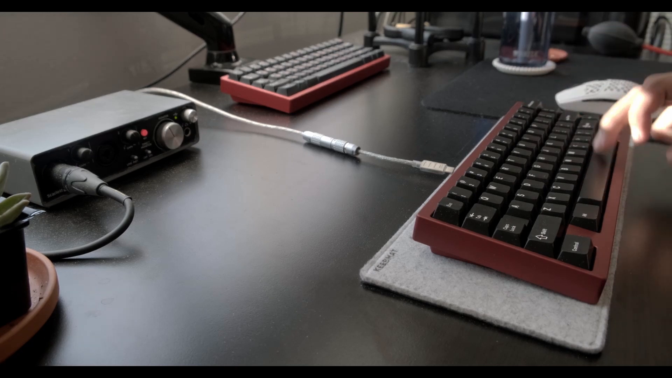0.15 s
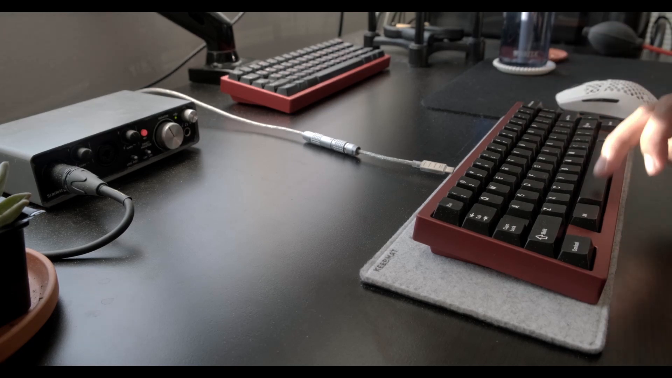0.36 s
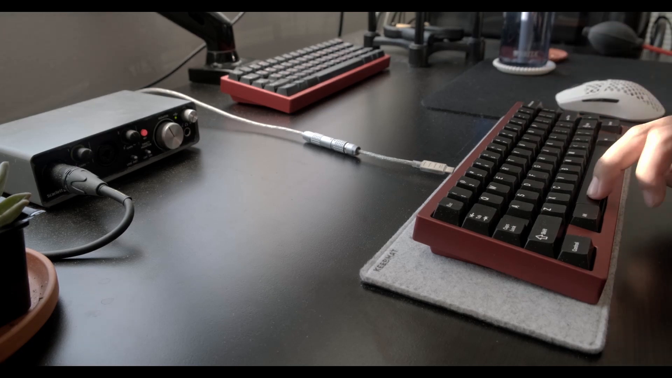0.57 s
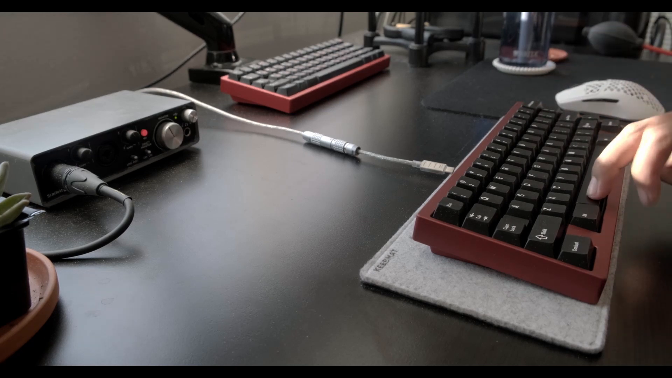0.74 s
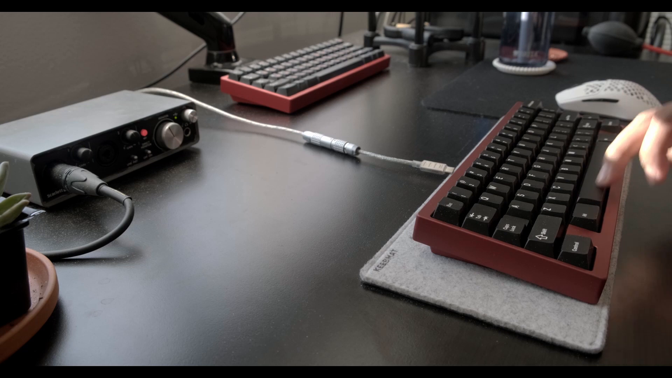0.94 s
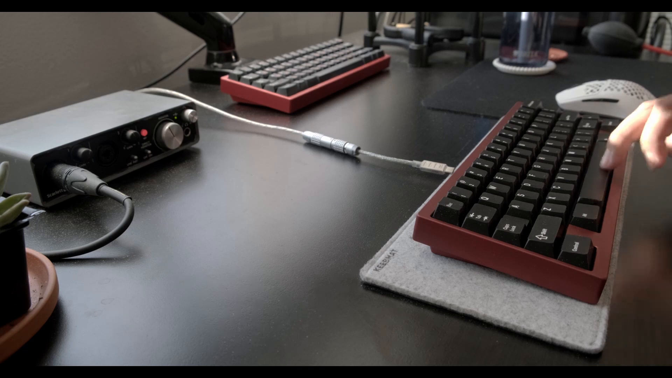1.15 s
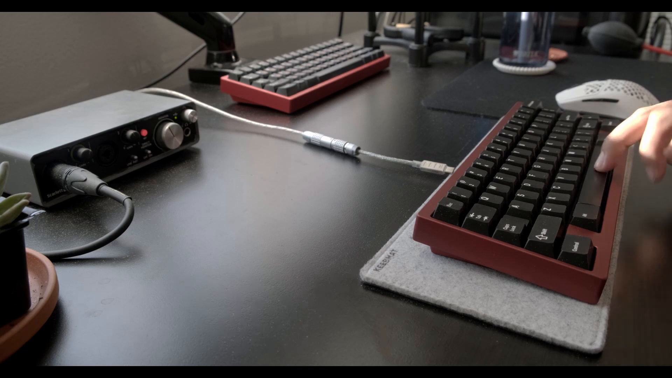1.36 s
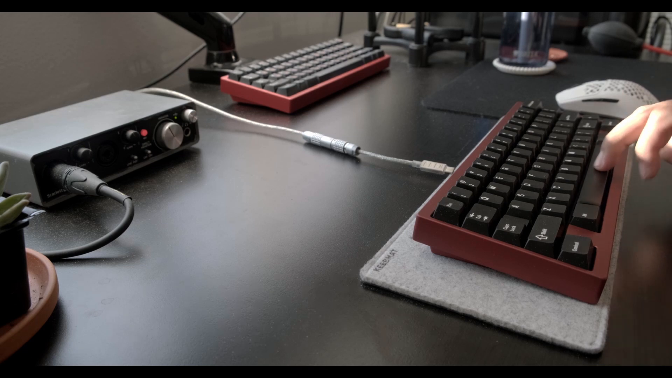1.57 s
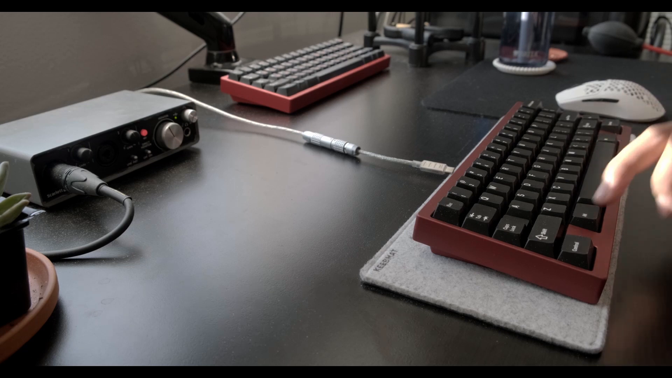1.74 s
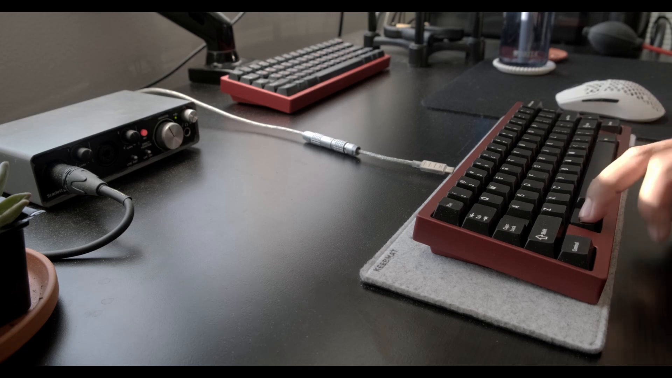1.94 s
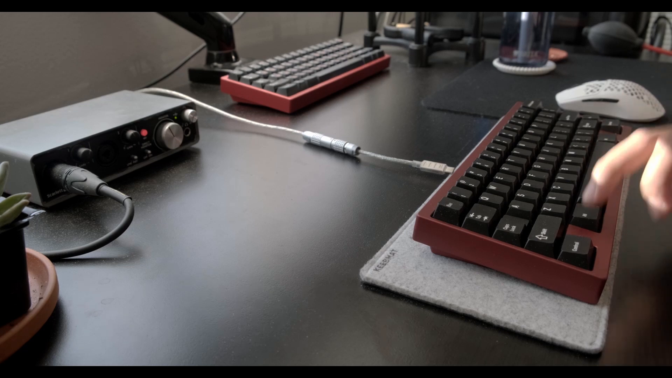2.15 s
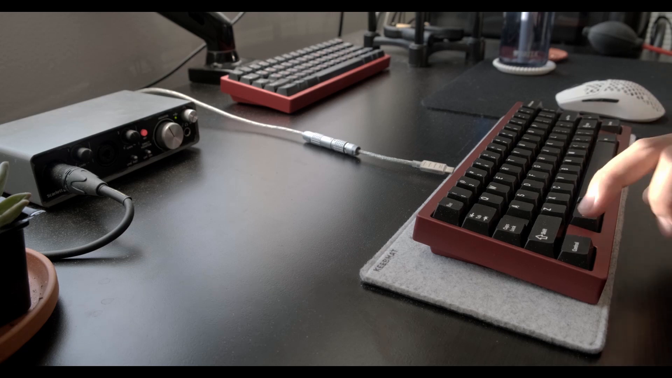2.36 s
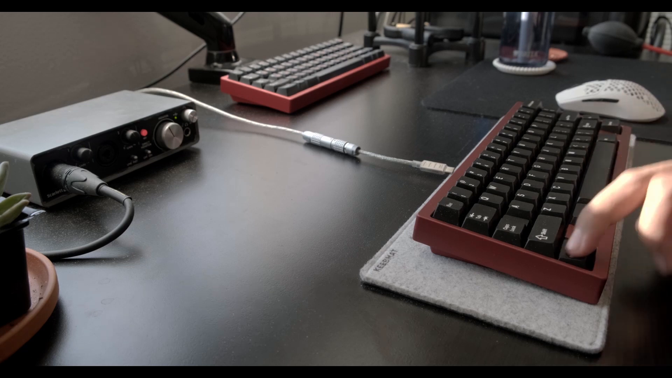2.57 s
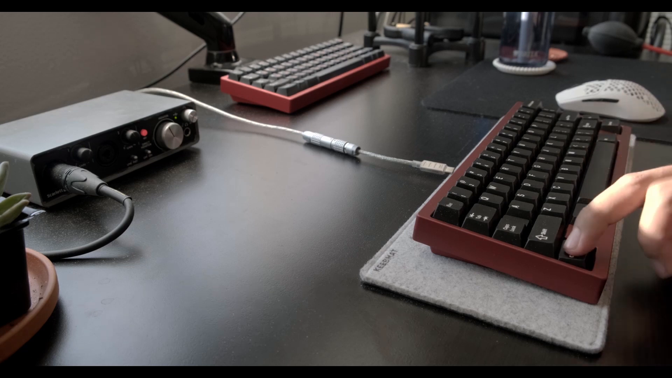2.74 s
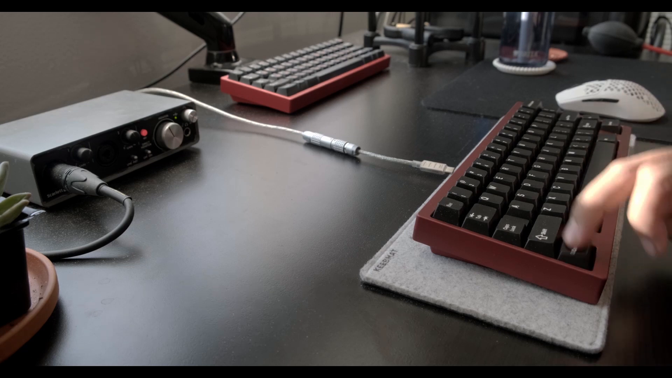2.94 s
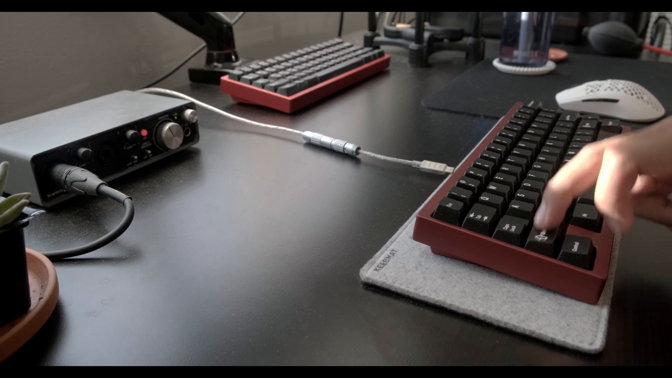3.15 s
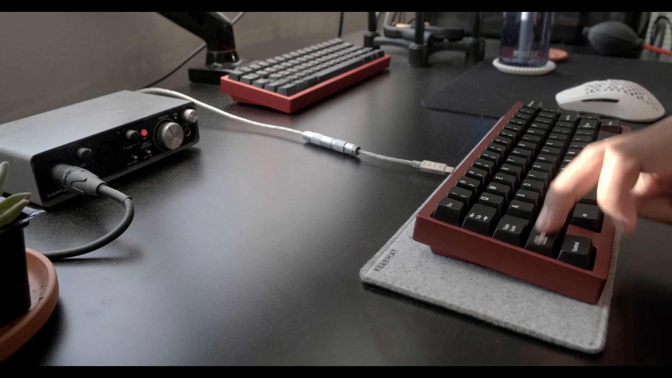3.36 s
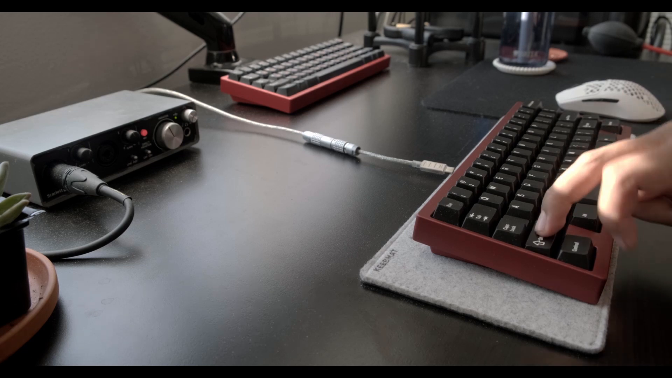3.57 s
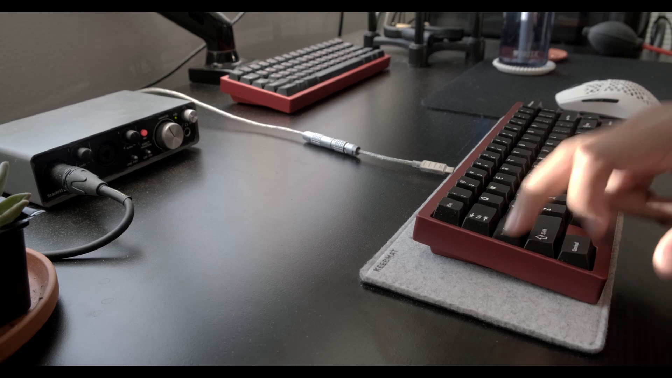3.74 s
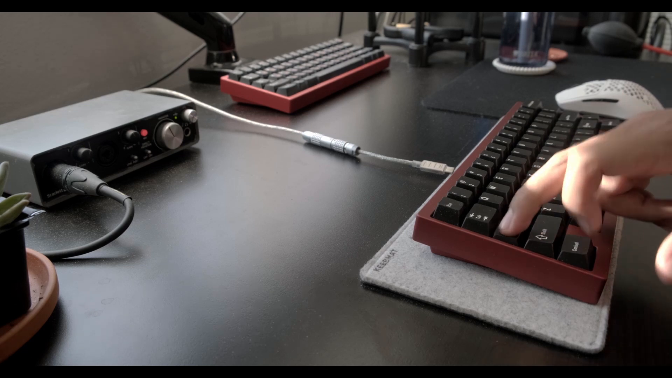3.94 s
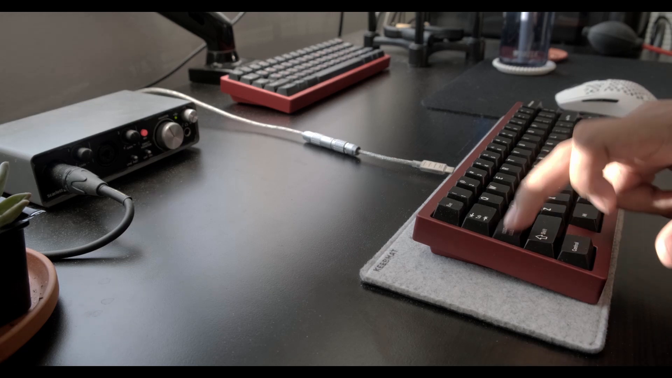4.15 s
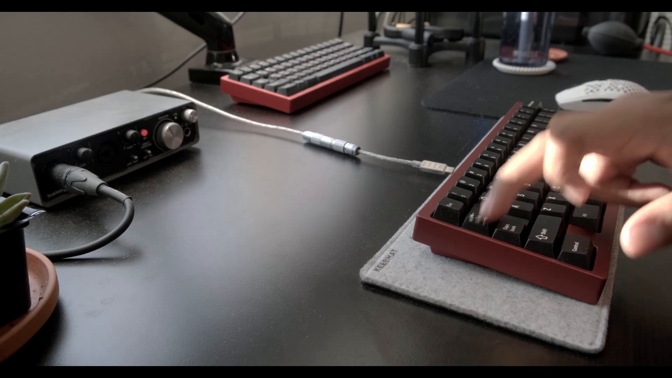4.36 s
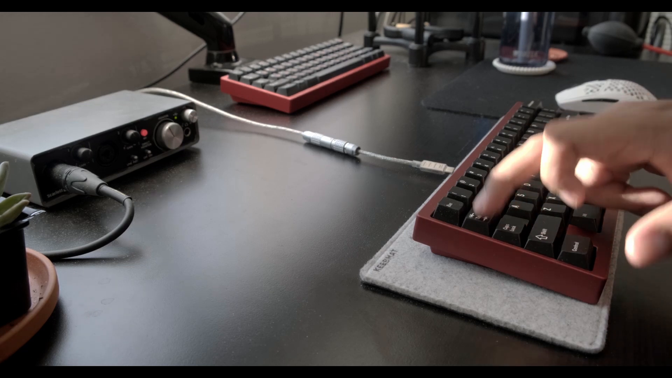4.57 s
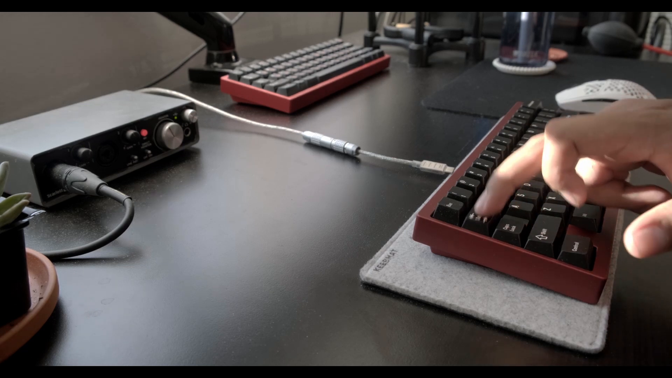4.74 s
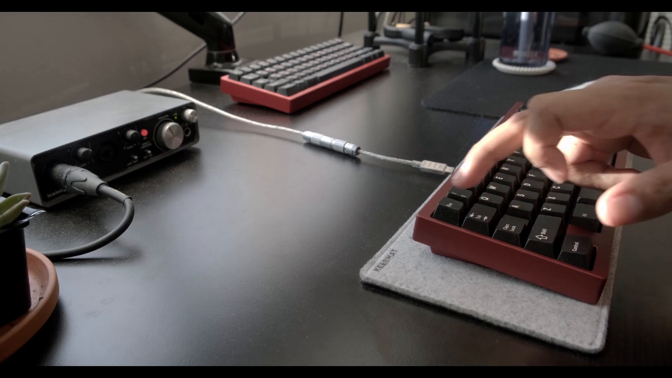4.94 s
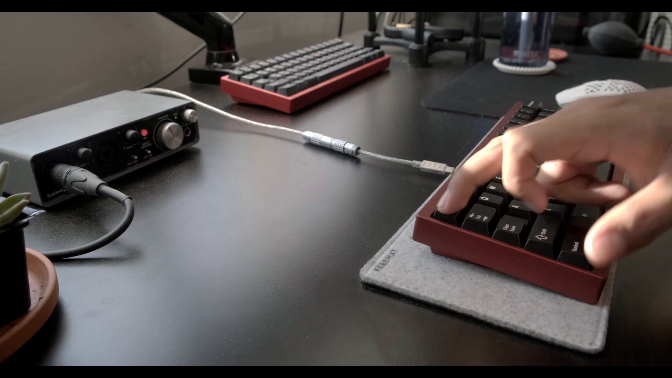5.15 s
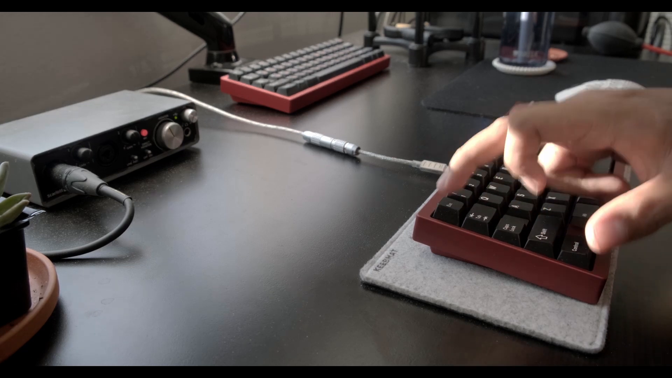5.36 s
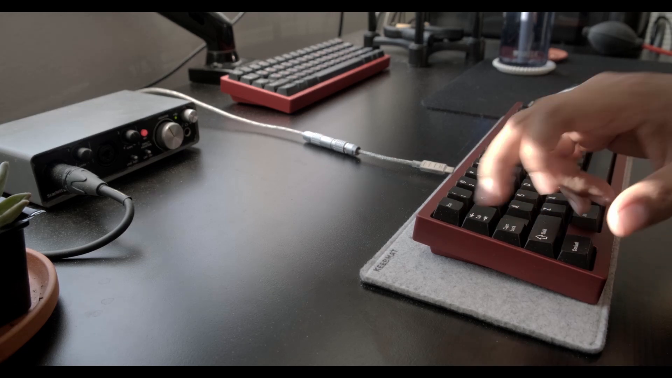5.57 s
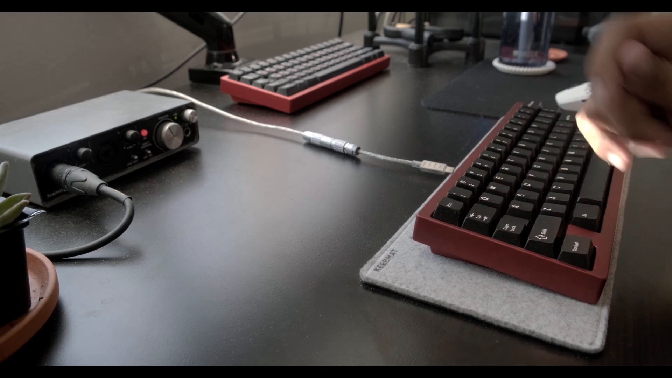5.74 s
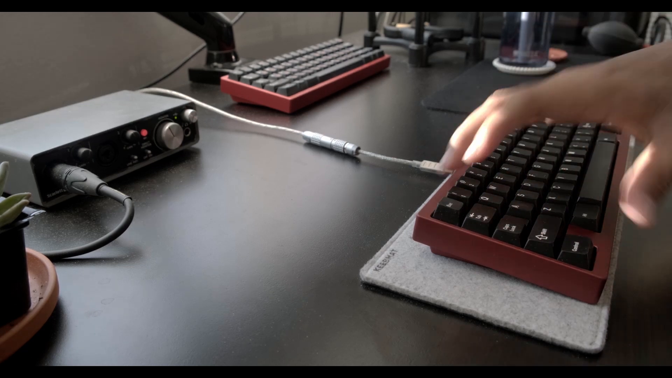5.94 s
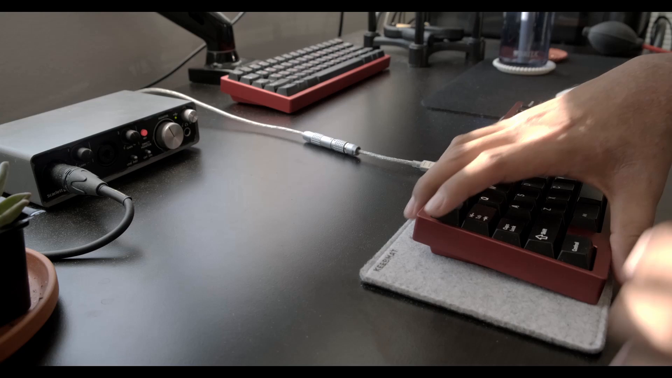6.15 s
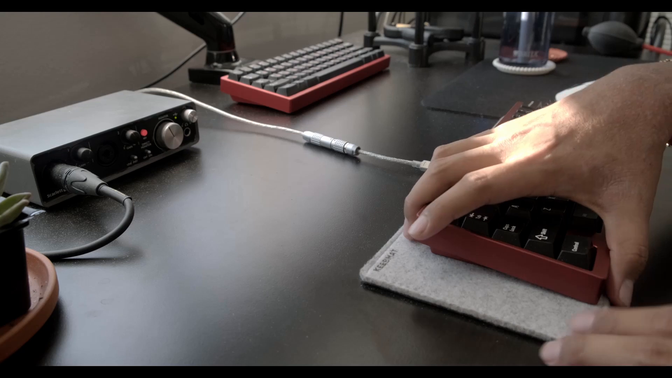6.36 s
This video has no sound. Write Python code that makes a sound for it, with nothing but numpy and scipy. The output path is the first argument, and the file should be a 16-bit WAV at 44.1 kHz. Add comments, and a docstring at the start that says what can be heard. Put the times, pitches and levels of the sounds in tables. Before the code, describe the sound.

Close up in a small room, the space bar of a mechanical keyboard clacks about seven times a second. The finger then moves across six more keys, tapping each four times, the tone shifting from key to key and the level generally dropping. Releases click back and the desk gives soft low thuds. Near the end the taps cease, and a brief skin brush and dull rustle pass over a faint fan hum.

```python
"""Trying out a mechanical keyboard

One finger taps a keyboard on a felt mat: a long run on the space bar, then four taps on each of six keys.
Each key clacks as it bottoms out and ticks as it springs back: impacts ring its resonances and spring.
The desk thuds and sways; a small room answers. The hand brushes away, leaving fan hum and faint hiss."""
import sys
import numpy as np
from scipy import signal
from scipy.fft import rfft, irfft
from scipy.io import wavfile
from scipy.ndimage import uniform_filter1d

SR = 44100
rng = np.random.default_rng(int(sys.argv[2]) if len(sys.argv) > 2 else 0)


def waveform_to_disk(signal):
    """Save audio, clipped to [-1, 1], as 16-bit WAV at the path in sys.argv[1]."""
    frames = np.transpose(np.atleast_2d(signal))
    scaled = np.clip(frames, -1, 1) * 32767
    samples = np.round(scaled).astype(np.int16)
    wavfile.write(sys.argv[1], SR, samples)


N = 282240
TIME_S = np.arange(N) / SR

# Air noise spectrum. Each row: frequency in Hz, relative density in dB.
AIR_SPECTRUM = [(20, -5), (55, -8.5), (90, -4), (160, -10), (220, -9.5), (280, -4), (400, -5), (520, -12),
                (870, -13.5), (1300, -18.5), (2200, -23.5), (4300, -31.5), (8600, -37), (16000, -50.5)]
# Keys bottoming out. Each row: start in seconds, strength in dB.
PRESSES = [(0.0595, 15.5), (0.126, 14), (0.2047, 13), (0.4293, 14.5), (0.5703, 12.5), (0.7063, 11),
           (0.8578, 13), (1.0903, 18.5), (1.2316, 16), (1.3701, 17), (1.5157, 20.5), (1.8093, 11),
           (1.9547, 7), (2.0972, 6.5), (2.2431, 9.5), (2.4692, 15), (2.5998, 7), (2.7421, 6.5), (2.8849, 9),
           (3.1087, 5.5), (3.2503, 4), (3.403, 6.5), (3.5376, 5.5), (3.7737, 4), (3.9155, 3),
           (4.0676, -2.5), (4.1987, -3), (4.4027, 4.5), (4.5319, 1), (4.6845, -7), (4.7879, 0.9),
           (5.035, 9), (5.1586, 2.5), (5.2938, 3.5), (5.437, 6)]
# Keys springing back. Each row: start in seconds, strength in dB.
RELEASES = [(0.282, 13.5), (0.4901, 15.5), (0.8011, -8), (0.9635, 4.5), (1.1724, 10), (1.3122, 12),
            (1.4488, 18.5), (1.6138, 18), (1.8974, 2), (2.0368, 1.5), (2.1623, 13.5), (2.3284, 1),
            (2.5409, 4), (2.684, 5), (2.8107, 11.5), (2.981, 11.5), (3.1826, -2), (3.3303, 2.5),
            (3.4763, -5), (3.6432, 8.5), (3.8449, -0.9), (3.997, -2.5), (4.1255, -0.5), (4.2712, 1.5),
            (4.4531, 2), (4.596, 0.5), (4.7263, -7), (4.8662, -2), (5.0888, 7), (5.2343, 0), (5.3639, 7.5),
            (5.5374, -0.9)]
# Times in seconds at which the finger moves to the next key.
NEXT_KEY_S = [1.7, 2.4, 3.05, 3.7, 4.35, 4.95]
# Resonances of each key in its case.
# Each row: frequency in Hz, width in Hz, gain on press in dB, gain on release in dB.
SPACE_BAR = [(404, 191, -18, -22), (842, 445, -22, -27), (1081, 74, -23, -21), (1400, 294, -6, -11),
             (1705, 492, -4, -14), (2148, 314, 0, -14), (3281, 1250, -10, -23), (3865, 9897, -28, -43),
             (4436, 530, -15, -71), (8158, 1157, -25, -48), (12569, 818, -31, -47)]
KEY_1 = [(713, 176, -19, -17), (1223, 437, -31, -15), (1717, 536, -6, -17), (2216, 276, 0, -12),
         (2302, 4031, -16, -26), (3891, 695, -11, -22), (5341, 1169, -9, -36), (6338, 1398, -59, -21),
         (7682, 715, -4, -64), (9518, 1633, -13, -64), (12047, 2455, -15, -32)]
KEY_2 = [(472, 99, -27, -31), (808, 177, -12, -12), (1460, 382, -3, -8), (1844, 394, -1, -13),
         (2257, 666, 0, -14), (3760, 628, -20, -25), (5381, 1033, -15, -34), (5882, 813, -27, -24),
         (7111, 2199, -16, -34), (11568, 3281, -20, -45), (12378, 683, -13, -30)]
KEY_3 = [(524, 88, -24, -23), (773, 146, -12, -14), (1021, 200, -6, -13), (1612, 509, -4, -7),
         (2162, 478, 0, -9), (2950, 317, -11, -26), (3587, 692, -13, -22), (5318, 412, -55, -12),
         (5408, 2133, -13, -31), (9077, 694, -16, -34), (11319, 6715, -21, -40)]
KEY_4 = [(882, 162, -3, -4), (1081, 74, -8, -8), (1837, 1109, 0, -4), (3447, 2690, -2, -16),
         (3692, 326, -51, -11), (5495, 984, -2, -21), (6733, 710, -51, -13), (8631, 1871, -4, -25),
         (11476, 747, -12, -30), (13139, 355, -10, -21), (14765, 9897, -21, -39)]
KEY_5 = [(929, 152, -10, -9), (1139, 118, -7, -10), (1478, 3714, -19, -13), (1494, 163, 0, -3),
         (3757, 482, -14, -3), (3791, 3740, -3, -22), (6178, 590, -13, -4), (12438, 592, -10, -15),
         (14765, 9897, -22, -34)]
KEY_6 = [(830, 147, -14, -16), (982, 1492, -26, -21), (1066, 103, -11, -9), (1651, 545, -6, -13),
         (2361, 359, -3, -12), (3156, 1234, 0, -13), (4953, 1191, -4, -21), (6859, 697, -56, -25),
         (10113, 6158, -12, -28), (11720, 442, -7, -12), (12597, 738, -9, -23)]
KEY_MODES = [SPACE_BAR, KEY_1, KEY_2, KEY_3, KEY_4, KEY_5, KEY_6]
# Coil spring pings, two per key in key order. Each pair: frequency in Hz, base level in dB.
SPRING_MODES = [
    [(4400, -69), (7700, -75)],
    [(6330, -71), (12550, -77)],
    [(6300, -74), (9050, -76)],
    [(5350, -72), (7400, -80)],
    [(9120, -69), (7000, -73)],
    [(6330, -67), (12520, -79)],
    [(5700, -72), (11800, -73)],
]
# First echoes off the nearest walls. Each row: delay in seconds, gain in dB.
WALL_ECHOES = [(0.011, -20.5), (0.0149, -20.5)]
# Colour of the room's answer. Each row: frequency in Hz, gain in dB.
WALL_COLOUR = [(150, -12), (400, -4.5), (900, 7.5), (1500, -3), (2400, 0), (4000, -5.5), (7000, -3),
               (10000, -4), (15000, -11)]
# Skin over case and mat. Each row: peak time in seconds, level in dB, swell in seconds, fade in seconds.
BRUSHES = [(5.815, -50.5, .04, 0.021), (5.815, -46, .003, .006), (6.22, -68.5, 0.11, .12)]
# Brushing spectrum. Each row: frequency in Hz, relative density in dB.
BRUSH_SPECTRUM = [(1500, -35), (4000, -9.5), (7500, 0.5), (12000, 4), (16000, -6)]


def undb(db):
    """Decibels to gain."""
    return 10 ** (np.asarray(db) / 20)


def unit_rms(x):
    """Scale to rms 1."""
    return x / np.sqrt(np.mean(x ** 2))


def add(track, start_s, sound):
    """Mix a sound into the track."""
    i = max(int(round(start_s * SR)), 0)
    track[i:i + len(sound)] += sound[:len(track) - i]


def bins_hz(size, floor_hz=1):
    """FFT bin frequencies, clamped from below."""
    return np.maximum(np.fft.rfftfreq(size, 1 / SR), floor_hz)


def colour(x, points):
    """Filter by a curve of (Hz, dB) points."""
    hz, db = np.transpose(points)
    gain = undb(np.interp(np.log(bins_hz(len(x))), np.log(hz), db))
    return irfft(rfft(x) * gain, len(x))


def resonance(size, hz, width_hz):
    """Gain per FFT bin of a steep-sided resonance."""
    f = bins_hz(size)
    return 1 / (1 + ((f * f - hz * hz) / (f * width_hz)) ** 2)


def narrow_noise(hz, width_hz):
    """Noise through one resonance, rms 1."""
    return unit_rms(irfft(rfft(rng.standard_normal(N)) * resonance(N, hz, width_hz), N))


def ring(gain):
    """Minimum-phase response of a gain curve: sharp start, then each resonance decays."""
    cepstrum = irfft(np.log(gain + 1e-5))
    half = len(cepstrum) // 2
    cepstrum[1:half] *= 2
    cepstrum[half + 1:] = 0
    return irfft(np.exp(rfft(cepstrum)))


def key_at(time_s):
    """Index of the key under the finger."""
    return np.searchsorted(NEXT_KEY_S, time_s)


def room_tone(air_db=-57.5, hum_db=-60.5, hum_hz=191.3, whine_db=-73, whine_hz=342.4, flutter_db=-67):
    """Steady air noise and fan hum, with slight flutter near the hum's pitch."""
    air = undb(air_db) * unit_rms(colour(rng.standard_normal(N), AIR_SPECTRUM))
    hum = undb(hum_db) * np.sin(2 * np.pi * hum_hz * TIME_S)
    whine = undb(whine_db) * np.sin(2 * np.pi * whine_hz * TIME_S)
    flutter = undb(flutter_db) * narrow_noise(hz=207, width_hz=37)
    return air + np.sqrt(2) * (hum + whine) + flutter


def stem_slides(down_db=-61, down_s=0.022, up_db=-70, up_s=0.045):
    """The stem rubs in its housing, speeding up until it lands or tops out."""
    envelope = np.zeros(N)
    for strokes, db, travel_s in ((PRESSES, down_db, down_s), (RELEASES, up_db, up_s)):
        speed = np.linspace(0, 1, int(travel_s * SR))
        for impact_s, _ in strokes:
            add(envelope, impact_s - travel_s, speed * undb(db))
    friction = envelope * rng.standard_normal(N)
    return colour(friction, [(400, -10), (1200, 1), (3000, 2), (6500, 3), (14000, 0)])


def finger_touches(touch_db=-31, lead_s=0.0068, scatter_db=3):
    """The fingertip lands softly on the cap just before the key bottoms out."""
    out = np.zeros(N)
    for press_s, db in PRESSES:
        earliness, firmness = rng.standard_normal(2)
        touch = clack(press_s, db + touch_db + scatter_db * firmness)
        add(out, press_s - lead_s * np.exp(earliness / 4), touch)
    return out


def clack(start_s, db, tilt_db_per_oct=0, released=False, blur=0, beam_hz=1200, size=4096):
    """One impact rings the key's resonances; harder contact is shorter, so it tilts towards treble."""
    detune, vary_db = 0.0036, 0.76  # the finger never lands on the same spot twice
    power = 0
    for hz, width_hz, press_db, release_db in KEY_MODES[key_at(start_s)]:
        pitch, strength = rng.standard_normal(2)
        gain = undb((release_db if released else press_db) + vary_db * strength)
        # Low modes radiate alike in all directions: no blur below beam_hz.
        blurred_hz = np.hypot(width_hz, blur * max(hz - beam_hz, 0))
        mode = gain * resonance(size, hz * (1 + detune * pitch), blurred_hz)
        power += width_hz / blurred_hz * mode ** 2
    octaves = np.log2(bins_hz(size, floor_hz=300) / 2500)
    body = ring(np.sqrt(power) * undb(db + tilt_db_per_oct * octaves))
    return signal.fftconvolve(body, cap_chatter())


def cap_chatter(amount=0.15, decay_s=0.0022, highpass_hz=3000, size=512):
    """Contact force: one blow, then the light cap chatters with part of its treble energy."""
    contacts = amount * rng.standard_normal(size) * np.exp(-np.arange(size) / SR / decay_s)
    blow = signal.unit_impulse(size)
    chatter = (blow + contacts) / np.sqrt(1 + np.sum(contacts ** 2))
    highpass = signal.butter(1, highpass_hz, "high", fs=SR, output="sos")
    return blow + signal.sosfilt(highpass, chatter - blow)


def keystrokes(blur=0, press_db=-0.13, release_db=1.47, press_db_per_oct=-0.47, release_db_per_oct=-0.79):
    """Keys hit the plate going down, the switch top going up; firmer than the key's mean is brighter."""
    out = np.zeros(N)
    for strokes, gain_db, usual_db_per_oct, released in (
            (PRESSES, press_db, press_db_per_oct, False),
            (RELEASES, release_db, release_db_per_oct, True)):
        times_s, strengths_db = np.transpose(strokes)
        for start_s, db in strokes:
            mean_db = strengths_db[key_at(times_s) == key_at(start_s)].mean()
            tilt_db_per_oct = usual_db_per_oct + 0.2023 * (db - mean_db)
            add(out, start_s, clack(start_s, db + gain_db, tilt_db_per_oct, released, blur))
    return out


def spring_pings(release_db=0.5, t60_s=0.24, spread=0.0087, follow=0.39, count=9, size=17640):
    """Each impact jolts the coil spring, which rings in clusters of close modes, louder on release."""
    out, t = np.zeros(N), np.arange(size) / SR
    fade = np.exp(-np.log(1000) * t / t60_s)
    for strokes, gain_db in ((PRESSES, 0), (RELEASES, release_db)):
        for start_s, db in strokes:
            for hz, mode_db in SPRING_MODES[key_at(start_s)]:
                cluster_hz = hz * (1 + spread * rng.standard_normal((count, 1)))
                cycles = cluster_hz * t + rng.random((count, 1))
                ping = np.sin(2 * np.pi * cycles).sum(0) / np.sqrt(count)
                add(out, start_s, ping * fade * undb(gain_db + mode_db + follow * db))
    return out


def desk_thuds(gain_db=-55, centre_hz=100, rise_s=0.0057, follow=0.61, size=8192):
    """Each press reaches the desk through the felt as a soft, late thud."""
    out, t = np.zeros(N), np.arange(size) / SR
    swell = (t / rise_s) ** 2 * np.exp(-t / rise_s)
    for start_s, db in PRESSES:
        hz = centre_hz * (1 + 0.1 * rng.standard_normal())
        add(out, start_s, undb(gain_db + follow * db) * swell * np.sin(2 * np.pi * hz * t))
    return out


def desk_sway(hz=32.1, t60_s=1.8, rise_s=0.016, push_db=-48, follow=0.058, grip_s=6.27, grip_db=-46):
    """Presses and a last grip on the case rock the desk at its lowest mode; pushes add up or cancel."""
    out = np.zeros(N)
    envelope = (1 - np.exp(-TIME_S / rise_s)) * np.exp(-np.log(1000) * TIME_S / t60_s)
    rocking = envelope * np.sin(2 * np.pi * hz * TIME_S)
    for start_s, db in PRESSES:
        add(out, start_s, undb(push_db + follow * db) * rocking)
    add(out, grip_s, undb(grip_db) * rocking)
    return out


def room_response(near_db=-20, near_s=0.008, tail_db=-14.5, low_t60_s=0.53, high_t60_s=0.38, size=22050):
    """Things on the desk scatter at once; walls add echoes and a tail that loses treble first."""
    split_hz = 4500
    t = np.arange(size) / SR
    near, far = rng.standard_normal((2, size))
    near = near * np.exp(-t / near_s) * (t > 0.002)
    far = far * np.abs(rng.standard_normal(size)) * (t > 0.006)
    low = signal.sosfilt(signal.butter(2, split_hz, fs=SR, output="sos"), far)
    high = signal.sosfilt(signal.butter(2, split_hz, "high", fs=SR, output="sos"), far)
    tail = low * np.exp(-np.log(1000) * t / low_t60_s) - high * np.exp(-np.log(1000) * t / high_t60_s)
    response = undb(near_db) * near / np.linalg.norm(near) + undb(tail_db) * tail / np.linalg.norm(tail)
    for delay_s, db in WALL_ECHOES:
        response[int(delay_s * SR)] += undb(db)
    return response


def room_reflections(keys, lead_s=0.038):
    """Each tap gets its own short room echo, slightly different in colour."""
    out = np.zeros(N)
    starts = [max(int((press_s - lead_s) * SR), 0) for press_s, _ in PRESSES]
    for start, tap in zip(starts, np.split(keys, starts)[1:]):
        add(out, start / SR, signal.fftconvolve(tap, room_response()))
    return colour(out, WALL_COLOUR)


def hand_rustle(level_db=-62, peak_s=6.1, spread_s=0.68):
    """A dull rustle swells as the hand lifts and grips the case."""
    swell = np.exp(-((TIME_S - peak_s) / spread_s) ** 2)
    return undb(level_db) * narrow_noise(hz=170, width_hz=150) * swell


def skin_brushes(grain_db=1.5):
    """Skin drags in tiny catches; each brush swells as the hand speeds up and fades as it lifts."""
    power = 0
    for peak_s, db, swell_s, fade_s in BRUSHES:
        before_s, after_s = np.maximum(peak_s - TIME_S, 0), np.maximum(TIME_S - peak_s, 0)
        power += (undb(db) * np.exp(-before_s / swell_s - (after_s / fade_s) ** 2)) ** 2
    catches = unit_rms(uniform_filter1d(rng.standard_normal(N), size=90))
    friction = unit_rms(colour(rng.standard_normal(N), BRUSH_SPECTRUM))
    return friction * np.sqrt(power) * undb(grain_db * catches)


def scene():
    """Keyboard, desk, hand and room, close up in mono."""
    direct = keystrokes() + finger_touches() + spring_pings() + stem_slides()
    # The room hears the keys from all sides, which blurs their upper resonances.
    scattered = room_reflections(keystrokes(blur=0.64))
    desk = desk_thuds() + desk_sway()
    return (direct + scattered + desk + skin_brushes() + hand_rustle() + room_tone())[None]


def record(dry):
    """Steep low-pass on the top treble."""
    cutoff_hz = 16200
    return signal.sosfilt(signal.ellip(8, 0.2, 70, cutoff_hz, fs=SR, output="sos"), dry)


dry = scene()
out = record(dry)
waveform_to_disk(out)
```